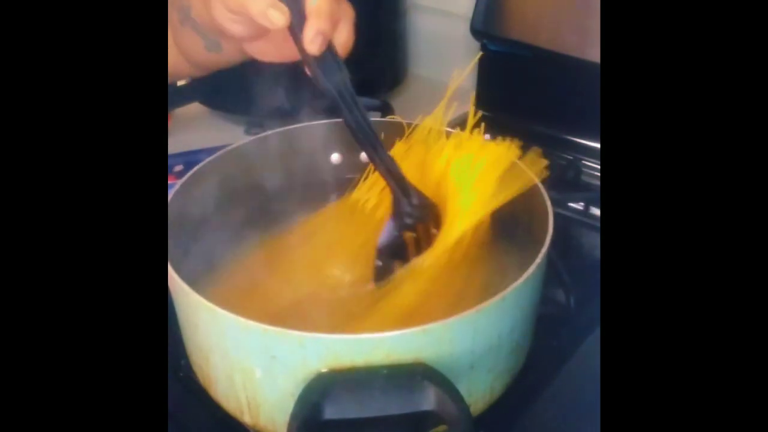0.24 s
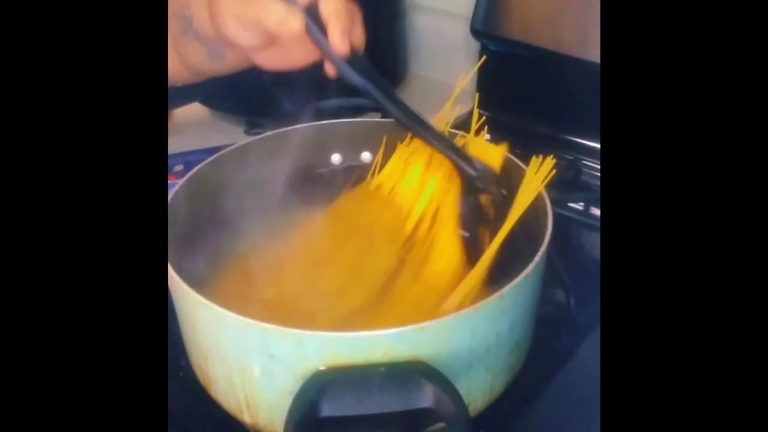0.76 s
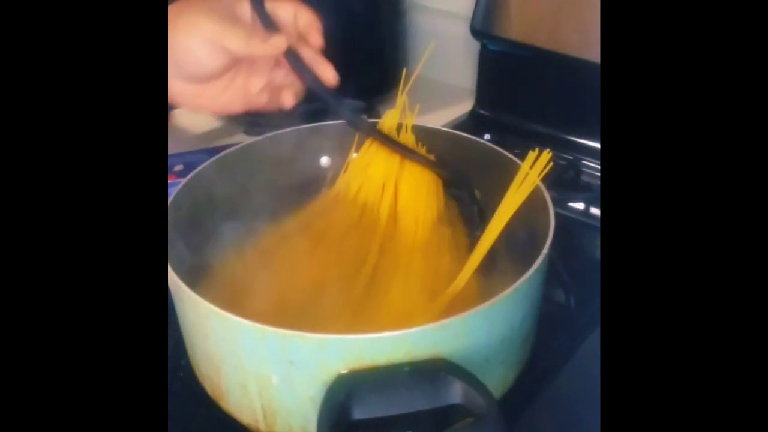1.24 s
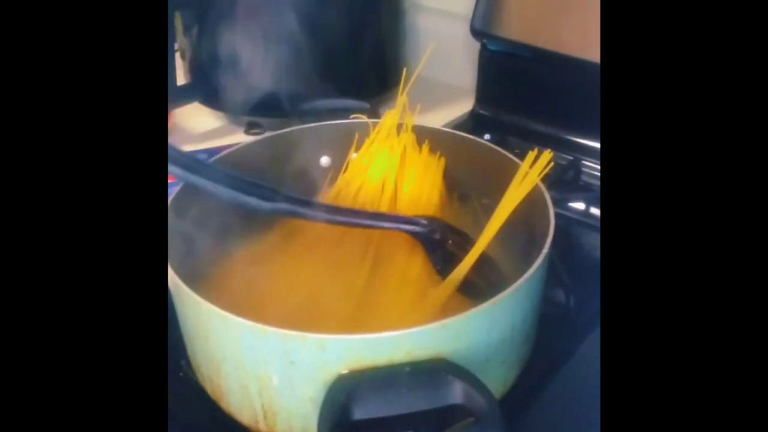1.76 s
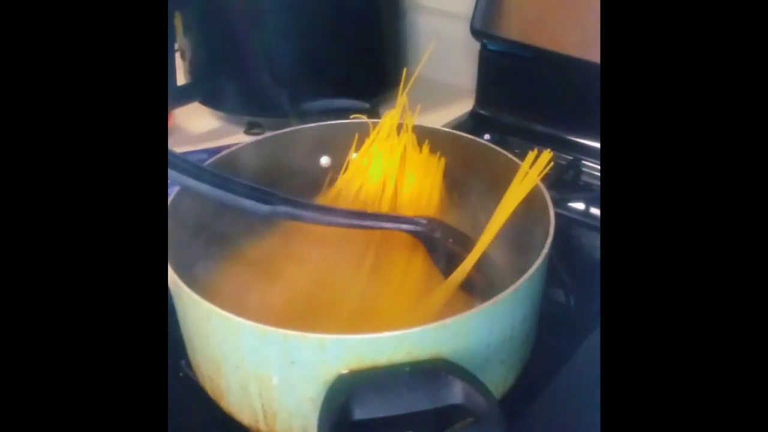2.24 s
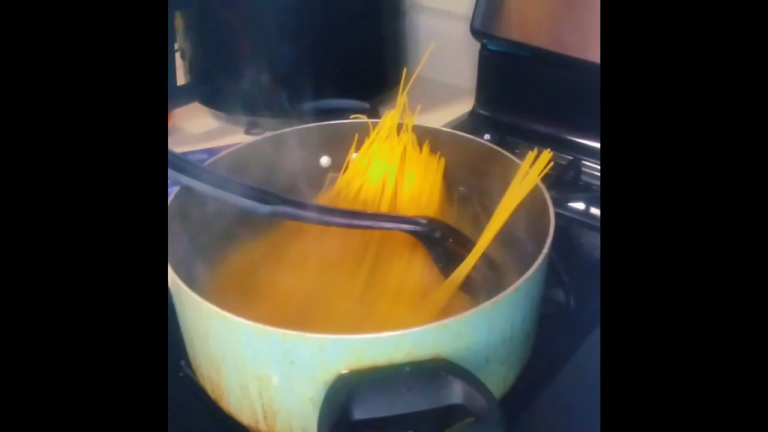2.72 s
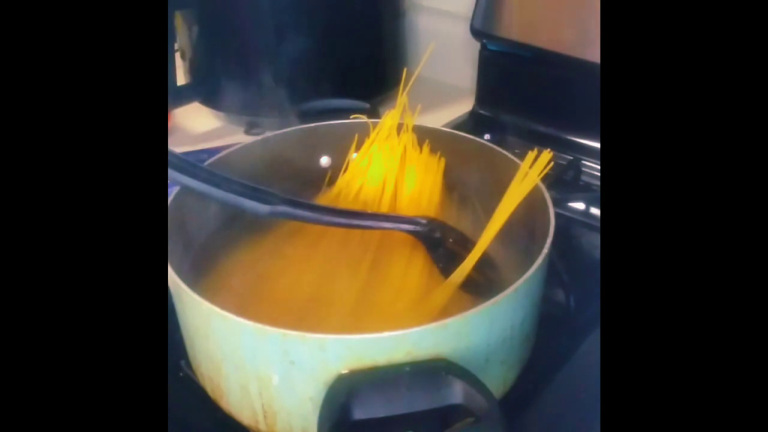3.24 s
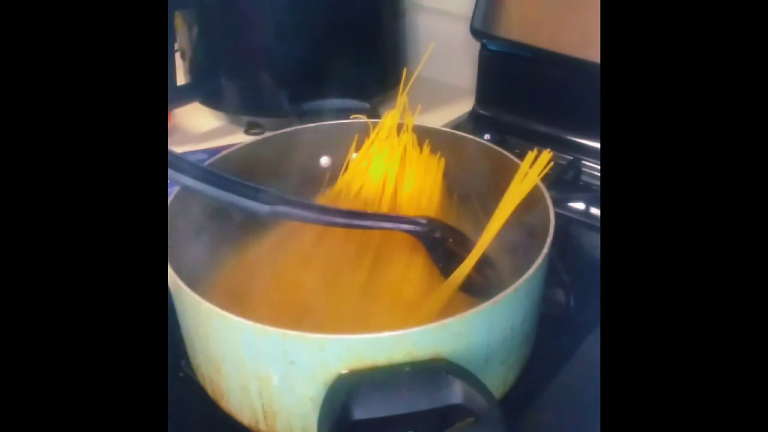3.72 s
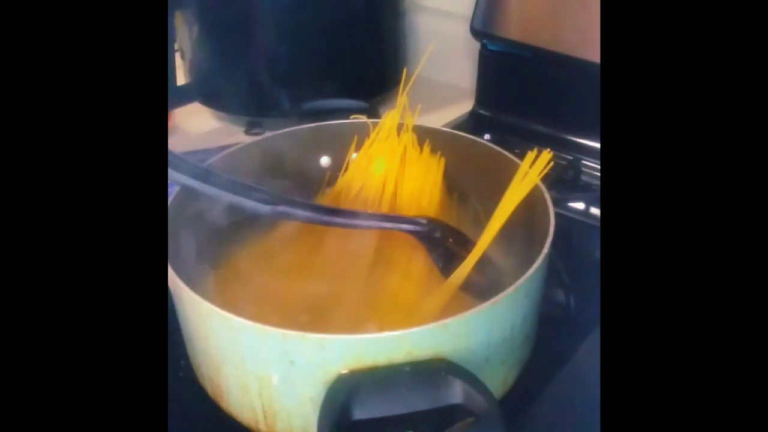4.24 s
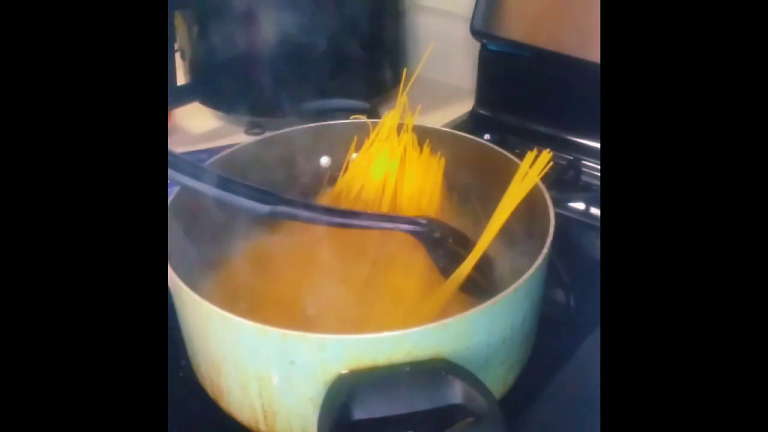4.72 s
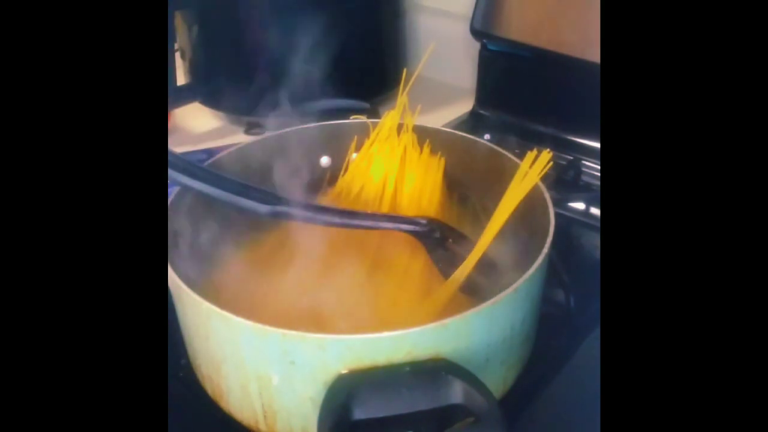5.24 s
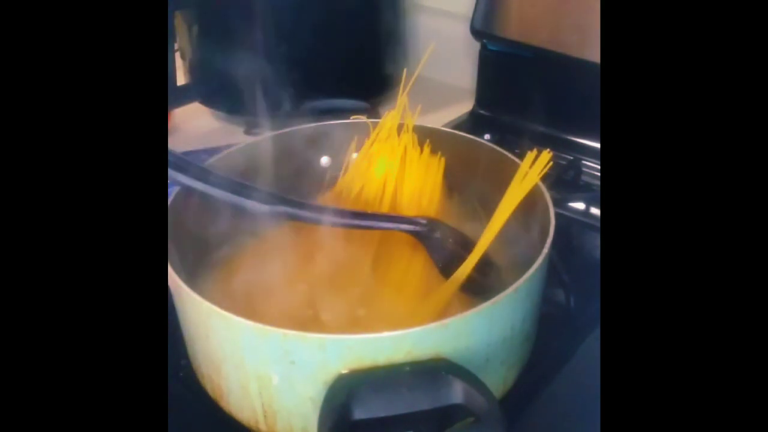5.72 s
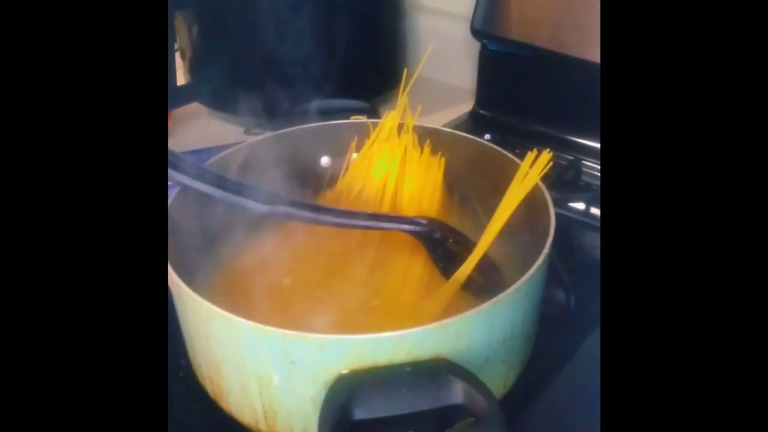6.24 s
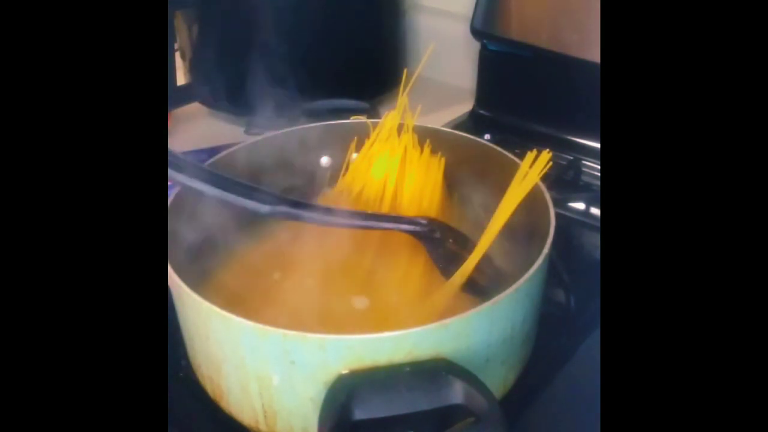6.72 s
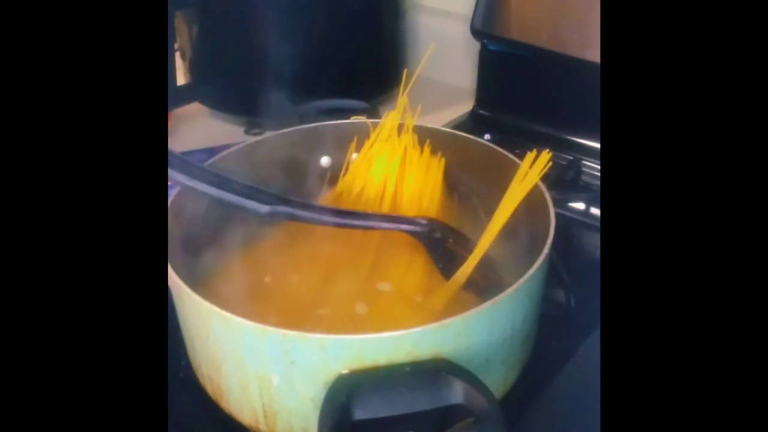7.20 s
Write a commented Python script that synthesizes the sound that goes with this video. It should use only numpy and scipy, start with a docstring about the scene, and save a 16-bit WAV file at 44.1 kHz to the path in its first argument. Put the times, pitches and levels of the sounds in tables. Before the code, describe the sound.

Pot of water simmers while a plastic spoon clicks and bumps; sizzles flare and cut off, then surge with brittle crackling and gurgles.

```python
"""A pot of water simmers; plops and bumps of a plastic spoon are heard, and short sizzles flare, sag and break off.
From 0.6 s the first of three longer boils sizzles, with clicks of spoon and dry spaghetti from then on.
The later two, near 2.8 s and 4.3 s, surge, with gurgles and brittle ticks; from 5.9 s the spoon also scrapes.
Sizzle is random bursts shaped by filters, bubbles are fading tones, clicks are short noise; steam that escapes
alone whistles. The hollow of the pot colours sizzle and clicks, and a small kitchen answers softly."""
import sys
import numpy as np
from scipy import signal
from scipy.fft import rfft, irfft, next_fast_len
from scipy.io import wavfile
from scipy.ndimage import uniform_filter1d

SR = 44100
rng = np.random.default_rng(int(sys.argv[2]) if len(sys.argv) > 2 else 0)


def dump_mix(stems):
    """Bounce the given channels to the path in sys.argv[1] as a 16-bit WAV at rate SR."""
    frames = np.atleast_2d(stems).T  # one column per channel
    limited = np.clip(frames, -1, 1)  # hard clip at full scale
    pcm = np.round(limited * 32767).astype(np.int16)
    wavfile.write(sys.argv[1], SR, pcm)


N = 328986
TOP_HZ = 15800  # nothing is kept above this

# borders between spatter, hiss, steam and fizz, the sizzle's grain sizes from coarse to fine: [f/Hz]
GRAIN_EDGES = [860, 2400, 6800, 9800, 15800]
# spectrum of low noise: [f/Hz, relative level/dB]
LOW_SPECTRUM = [(30, -13.5), (60, -5), (250, -2.5), (500, -11), (4000, -34.5)]
# spectrum of a hard, dry contact: [f/Hz, relative level/dB]
SNAP_SPECTRUM = [(300, -14.5), (1300, 8.5), (4000, 11.5), (8000, 13.5), (10500, 2.5), (15800, -20.5)]


def sizzle(gains, on):
    """Water flashes to steam in tiny bursts; gurgles follow the spatter, low noise comes and goes with the sizzle."""
    # spectrum of the bursts: [f/Hz, relative level/dB]
    sizzle_spectrum = [(1000, -2.5), (1350, 11), (3300, 7), (6300, 9.5), (7500, 11), (8700, 17), (10000, 2),
                       (12500, -4.5), (15800, -11.5)]
    # share of the surrounding half second that sizzles
    sustained = np.abs(uniform_filter1d(on, SR // 2))

    # a weak flare comes from a few spots, each with its own colour; a strong one is dense and even
    strength = gains.sum(axis=0) / amp(-19.5)
    even = np.clip(strength ** 2 + 0.68 * sustained ** 2, 0, 1)
    spots = unit(patchy(crackle(rate=7000, spread_db=7), depth_db=6.5, size=(5, 10)))
    dense = unit(patchy(crackle(rate=5500, spread_db=10), depth_db=3.8, size=(6, 4)))
    bursts = np.sqrt(even) * dense + np.sqrt(1 - even) * spots

    # the bursts come in clusters a few milliseconds long
    clusters = amp(1.3 * wobble(hz=90))
    bursts = hollow(coloured(bursts * clusters, sizzle_spectrum))
    spatter, hiss, steam, fizz = [unit(band(bursts, lo, hi)) for lo, hi in zip(GRAIN_EDGES, GRAIN_EDGES[1:])]
    # a long boil leaves less of the steam to whistle
    share = whistle_share(gains) * (1 - sustained ** 2 / 2)
    grains = np.sum(gains * [spatter, hiss, narrowed(steam, share), fizz], axis=0)

    clumps = patchy(bubbling(rate=130, mid_hz=800, spread=.8, cycles=32), depth_db=4, size=(5, 7))
    # the gurgle follows the spatter; a long boil gurgles more
    gurgle_gain = amp(-12.5) * sustained ** 0.32 * np.abs(gains[0]) ** 0.98
    gurgle = gurgle_gain * unit(hollow(clumps))
    low_noise = amp(-65.0) * on * unit(coloured(rng.standard_normal(N), LOW_SPECTRUM))
    return grains + ticks(gains, sustained) + gurgle + low_noise


def flare_gains():
    """Strength of each grain size, and where the sizzle is heard; its sound starts and stops abruptly."""
    # short flares: [start t/s, end t/s, spatter level/dB, hiss level/dB, steam level/dB, fizz level/dB]
    flares = [ (0.103, 0.203, -71.5, -49.5, -45.5, -48.5), (0.404, 0.458, -77, -52.5, -46.5, -53.5),
              (0.489, 0.513, -79, -51, -42, -49), (0.553, 0.595, -66, -41.5, -50, -55),
              (1.03, 1.131, -51, -50, -44.5, -52.5), (1.222, 1.328, -49, -43, -55, -72),
              (1.355, 1.525, -48.5, -47.5, -43, -71), (1.847, 1.885, -51, -41.5, -46, -51),
              (2.111, 2.185, -75, -74, -41.5, -82.5), (2.389, 2.471, -46, -41.5, -50, -55.5),
              (2.535, 2.548, -52, -41, -42.5, -53), (2.65, 2.691, -48, -44.5, -61, -75),
              (2.728, 2.793, -51, -45.5, -58.5, -58), (4.024, 4.1, -57, -65.5, -53.5, -41.5),
              (5.589, 5.74, -53.5, -44.5, -48, -58), (5.722, 5.82, -65.5, -54, -43, -50),
              (5.794, 5.863, -51.5, -52.5, -49, -56), (6.043, 6.109, -43.5, -41, -70, -59),
              (6.677, 6.746, -49, -53, -48, -64), (7.12, 7.147, -40, -53.5, -58.5, -72)]
    # how far each grain size would die down in an endless flare: [drop/dB]
    sag_drops = [20, 9.3, 20, 35]
    half_sag_s = 0.14  # half of that drop is reached after this time
    # the three long boils, each a list of points: [t/s, level/dB, coarseness/dB]
    boils = [
        [(.625, -31, -18), (.71, -32, -11.5), (.85, -30, -35.5), (1.03, -38, -30)],
        [(2.78, -33.5, -0.5), (2.9, -50, 10), (3.3, -36, 2), (3.65, -38.5, -1.5), (3.815, -46, 0)],
        [(4.258, -38, 0.5), (4.44, -41.5, -1.5), (4.55, -40, 4), (4.8, -33, -6.5), (4.92, -38.5, 12.5),
         (5.36, -34.5, 3), (5.523, -54.5, 10.5)],
    ]
    # brief surges of the sizzle: [t/s, level/dB, coarseness/dB, fade/s]
    surges = [(1.44, -36.5, -28, 0.05), (2.969, -29.5, 4, 0.068), (3.368, -27.5, 4, 0.048),
              (3.466, -27.5, -9.5, 0.067), (4.312, -30.5, -6.5, 0.042), (4.537, -32, -2, 0.038),
              (4.63, -26, -25, 0.013), (4.986, -30.5, 15, 0.021), (5.169, -19, -8, 0.034),
              (5.248, -27, -8.5, 0.011), (5.65, -38, 3, 0.035)]
    surge_rise_s = 0.027

    t = np.arange(N) / SR
    power, on = np.zeros((4, N)), np.zeros(N)
    for start, end, *levels in flares:
        i = np.arange(round(start * SR), round(end * SR))
        age = (i - i[0]) / SR
        for grain, (db, sag) in enumerate(zip(levels, sag_drops)):
            sagging = unit(amp(-sag * age / (age + half_sag_s)))
            power[grain, i] = (amp(db) * sagging) ** 2
        on[i] = 1
    for rows in boils:
        i = np.arange(round(rows[0][0] * SR), round(rows[-1][0] * SR))
        power[:, i] = grain_levels(*curves(rows)[:, i]) ** 2
        on[i] = 1
    for s, db, coarse_db, fade in surges:
        shape = np.exp(-np.where(t < s, ((t - s) / surge_rise_s) ** 2, (t - s) / fade))
        power += np.outer(grain_levels(db, coarse_db) ** 2, on * shape ** 2)
    width = round(.005 * SR)  # 5 ms of smoothing softens the starts and stops
    return uniform_filter1d(np.sqrt(power), width), uniform_filter1d(on, width)


def grain_levels(db, coarse_db):
    """Gains of spatter, hiss, steam and fizz in a boil of this level and coarseness."""
    # each grain size relative to the level of the boil: [level/dB]
    grain_offsets = [-11, -5.5, -3, -10.5]
    # what each grain size gains per dB of coarseness: [slope/(dB per dB)]
    coarse_slopes = [1, 0.48, 0.13, 0.22]
    return amp([db + base + slope * coarse_db for base, slope in zip(grain_offsets, coarse_slopes)])


def whistle_share(gains):
    """Steam whistles when it escapes alone: 1 where it outweighs hiss and fizz by 0.5 dB, otherwise 0."""
    _, hiss, steam, fizz = np.abs(gains) + 1e-9
    lead_db = 20 * np.log10(steam / np.hypot(hiss, fizz))
    return (lead_db > 0.5).astype(float)


def narrowed(steam, share):
    """Part of the rushing steam gathers into a breathy whistle whose pitch wanders slowly."""
    # pitch of the whistling steam: [t/s, f/Hz]
    steam_pitch = [(.8, 7620), (1.47, 8090), (2.15, 7745)]
    pitch_hz = curves(steam_pitch)[0] + 107 * wobble(hz=4.6)  # wanders by 107 Hz rms
    return np.sqrt(1 - share) * steam + np.sqrt(share) * whistle(pitch_hz, width_hz=320)


def ticks(gains, sustained):
    """Brittle ticks, strongest in the long boils: many faint, a few sharp."""
    snaps = patchy(crackle(rate=520, spread_db=13), depth_db=5, size=(9, 2))
    snaps = snaps * amp(3.5 * wobble(hz=20))
    snaps = unit(band(hollow(coloured(snaps, SNAP_SPECTRUM)), GRAIN_EDGES[1], TOP_HZ, order=3))
    return amp(-2.5) * sustained * gains[1] * snaps  # they follow the hiss


def clicks(t60=0.0085, lead_t60=.006, tail_db=-15, tail_t60=0.21, top_hz=7500):
    """A brief catch, a sharp crack, then a short scatter between the pot's walls; dull contacts lose their top."""
    # spoon and pasta clicks and spits of water, before the hollow rings: [t/s, peak level/dB, dullness/dB]
    contacts = [(0.608, -28, -1.5), (1.0269, -15, 7), (1.2242, -17.5, -1.5), (2.379, -30, -5),
                (2.508, -32.5, -2), (2.7806, -22, 9), (3.277, -12.5, -0.5), (3.39, -9, -12.5),
                (3.467, -14, -25), (3.601, -12.5, -9.5), (4.713, -7.5, -5), (5.0489, -10, -5),
                (5.144, -8, -8.5), (5.1538, -9, -7.5), (5.229, -12, -5.5), (5.2352, -8.5, 7.5),
                (5.2597, -15, -14.5), (5.942, -43.5, 30), (6.687, -18, 9), (7.192, -38, 8)]
    out, t = np.zeros(N), np.arange(-SR // 64, SR // 8) / SR
    catch_and_crack = amp(-60 * np.abs(t) / np.where(t < 0, lead_t60, t60))
    scatter = (t > 0) * amp(tail_db - 60 * t / tail_t60)
    for s, db, dull_db in contacts:
        crack = coloured(rng.standard_normal(len(t)) * (catch_and_crack + scatter), SNAP_SPECTRUM)
        # the two soft edges may cross, which leaves only a weak treble
        bright = band(crack, 9500, top_hz * amp(-.2 * dull_db), order=4)
        dull = amp(dull_db - 9.0) * band(crack, 900, 4700, order=3)
        crack = bright + dull
        add(out, s + t[0], amp(db) * crack / np.abs(crack).max())
    return hollow(out)


def scrapes(width_hz=420):
    """The spoon slides on the pasta, sticking and slipping in uneven fits; each slip rings its short resonances."""
    # slides of the spoon: [start t/s, length/s, level/dB]
    slides = [(5.91, .13, -52), (6.437, 0.19, -59), (7.161, 0.288, -61.5)]
    # resonances of the spoon: [f/Hz, level of each/dB]
    spoon_modes = [(1330, 3), (2500, 3), (4050, -2.5)]
    slips = patchy(crackle(rate=900, spread_db=8), depth_db=6, size=(7, 3))
    slips = slips * amp(3 * wobble(hz=25))
    rasp = filtered(slips, lambda f: sum(amp(db) * resonance(f, hz, width_hz) ** 2 for hz, db in spoon_modes))
    rasp = unit(band(rasp, 700, 5500, order=3))
    t, gain = np.arange(N) / SR, np.zeros(N)
    for s, length, db in slides:
        gain += amp(db) * np.clip(np.minimum(t - s, s + length - t) / .015, 0, 1)  # 15 ms ramps
    return rasp * gain


def plops_and_taps(cycles=28, rough=0.45, splash_db=-6, splash_t60=0.053):
    """Plops and light spoon taps, each with a short ring, a splutter at its own pitch and a brighter splash."""
    # plops and taps; ring, splutter and splash are set relative to the level: [t/s, level/dB, f/Hz]
    short_rings = [(0.045, -31.5, 2700), (0.494, -36, 683), (2.662, -29, 1550), (2.731, -29.5, 1570),
                   (3.468, -39, 612), (3.537, -39, 606), (3.769, -34, 496), (4.138, -37, 522),
                   (4.477, -36.5, 502), (4.732, -28.5, 1294), (4.736, -30.5, 716), (5.482, -39.5, 486),
                   (7.104, -34, 840), (7.119, -32, 726)]
    out, t = np.zeros(N), np.arange(SR // 10) / SR
    for s, db, hz in short_rings:
        ring = bubble(hz, cycles, rise=0.048)
        fading_noise = rng.standard_normal(len(t)) * amp(-60 * t * hz / cycles)
        splutter = signal.fftconvolve(bubble(hz, cycles / 2, rise=0), fading_noise)
        splash = band(rng.standard_normal(len(t)) * amp(-60 * t / splash_t60), hz, 2 * hz, order=4)
        add(out, s, amp(db + 4.5) * ring)
        add(out, s, amp(db + 3.0) * rough * splutter / np.abs(splutter).max())
        add(out, s, amp(db + splash_db) * splash / np.abs(splash).max())
    return out


def gurgles(rate=120, cycles=28, scatter=0.14):
    """A pocket of steam works its way up as a chain of bubbles, alike within scatter octaves."""
    # chains of bubbles: [start t/s, length/s, level/dB, f/Hz]
    chains = [(0.725, 0.15, -58.5, 747), (1.356, 0.042, -51, 805), (3.343, .06, -45, 625),
              (3.968, 0.11, -55, 758), (4.014, .085, -50, 1310), (4.08, 0.42, -60.5, 505),
              (4.14, .018, -40, 1295), (4.954, 0.061, -37, 1086), (5.792, 0.078, -46.5, 1290),
              (5.795, 0.072, -50, 775), (6.409, 0.094, -61.5, 727), (6.627, 0.045, -53.5, 1285),
              (6.8, 0.13, -61.5, 746), (7.115, 0.028, -46, 1286)]
    out = np.zeros(N)
    for s, length, db, hz in chains:
        chain, count = np.zeros(SR), int(length * rate) + 1
        for k, (late, pitch, size) in enumerate(rng.uniform(-1, 1, size=(count, 3))):
            when = length * (k + late / 2) / count
            add(chain, when, amp(11 * size) * bubble(hz * 2 ** (scatter * pitch), cycles, rise=0))
        # unit() counts the whole second, so a short chain is scaled by its length
        add(out, s, amp(db) * np.sqrt(length) * unit(chain))
    return out


def knocks(detune=0.051):
    """The pot thuds on its burner, seated a little differently each time; a harder bump also rings its wall."""
    # bumps of the spoon on the pot: [t/s, level/dB, extra ring above 300 Hz/dB]
    bumps = [(0.108, -50.5, -17), (.195, -53.5, 0), (.359, -42.5, 10), (0.381, -36.5, -1),
             (4.051, -53.5, -11), (5.11, -53, -6)]
    # tones of the pot on its burner, before detuning: [f/Hz, relative level/dB, time to fade by 60 dB/s]
    body_modes = [(81, 2, 0.3), (109, 10, 0.088), (177, -2.5, 0.12), (523, 6, 0.075), (1105, 1, 0.032)]
    out, t = np.zeros(N), np.arange(SR // 3) / SR
    for s, db, ring_db in bumps:
        modes = np.zeros(len(t))
        for hz, level, t60 in body_modes:
            pitch = hz * (1 + detune * rng.standard_normal())
            modes += amp(level + ring_db * (hz > 300) - 60 * t / t60) * np.sin(2 * np.pi * pitch * t)
        scuff = amp(1 - 60 * t / 0.047) * unit(coloured(rng.standard_normal(len(t)), LOW_SPECTRUM))
        soft_start = 1 - np.exp(-t / 0.0038)
        add(out, s, amp(db) * (modes + scuff) * soft_start)
    return band(out, 38, 8000, order=3)


def simmer(gains):
    """Small bubbles murmur and the hot base sings, over low noise and a low hum that wavers."""
    # spectrum of the murmuring bubbles: [f/Hz, relative level/dB]
    murmur_spectrum = [(300, -25.5), (560, -12), (740, 4.5), (1000, -9), (1350, -5), (1900, -21),
                       (2600, -3.5), (4500, -18.5), (9000, -55.5)]
    # spectrum of the singing base: [f/Hz, relative level/dB]
    singing_spectrum = [(3750, -13.5), (4020, 13), (4350, -5), (6400, -3), (7500, 13), (9300, 6),
                        (10100, -10.5)]
    bubbling_gain, singing_gain = simmer_gains(gains)
    water = patchy(rng.standard_normal(N), depth_db=5.5, size=(5, 11))
    murmur = bubbling_gain * unit(coloured(water, murmur_spectrum))
    base = band(patchy(rng.standard_normal(N), depth_db=8, size=(4, 11)), 1800, 11000, order=4)
    singing = singing_gain * unit(coloured(base, singing_spectrum))
    hum = amp(-72) * whistle(np.full(N, 60), width_hz=5)
    low_noise = amp(-74.0) * unit(coloured(rng.standard_normal(N), LOW_SPECTRUM))
    return murmur + singing + hum + low_noise


def simmer_gains(gains, bubbling_db=-77, singing_db=-70, calm_s=0.0041):
    """Strength of bubbling and singing: at rest, stirred by spatter and steam, and swelling now and then."""
    # the stir of bubbling by spatter, and of singing by steam, relative to these: [level/dB]
    stir_levels = [-5.5, -17]
    # swells of the quiet boil: [t/s, half width/s, bubbling level/dB, singing level/dB]
    swells = [(.03, 0.096, -68.5, -55), (4.18, 0.48, -63, -63), (6.52, 0.051, -64, -56.5),
              (7.42, 0.18, -62.5, -67.5)]
    t, keep = np.arange(N) / SR, np.exp(-1 / (calm_s * SR))
    # the stir settles within milliseconds
    stir = amp(stir_levels)[:, None] * signal.lfilter([1 - keep], [1, -keep], gains[::2])
    power = amp([[bubbling_db], [singing_db]]) ** 2 + stir ** 2
    for s, width, *levels in swells:
        power += np.outer(amp(levels) ** 2, np.exp(-((t - s) / width) ** 2))
    return np.sqrt(power)


def kitchen(x, t60=0.24):
    """The short answer of the cupboards and walls, as noise that fades by 60 dB in t60 seconds."""
    t = np.arange(SR // 3) / SR
    tail = rng.standard_normal(len(t)) * amp(-60 * t / t60)
    return signal.fftconvolve(x, tail / np.linalg.norm(tail))[:N]


def hollow(x):
    """The direct sound and the ringing of the pot."""
    # air and wall of the pot: [f/Hz, width/Hz, level/dB]
    pot_modes = [(780, 28, 0.5), (1074, 5, 9.5), (2730, 11, -1.5), (4083, 90, 1)]
    return filtered(x, lambda f: 1 + sum(amp(db) * resonance(f, hz, width) for hz, width, db in pot_modes))


def resonance(f, hz, width_hz):
    """Response of one resonance: 1 at its pitch hz, less on either side."""
    return 1j * f * width_hz / (hz * hz - f * f + 1j * f * width_hz)


def bubble(hz, cycles, rise):
    """A bubble-like tone that fades by 60 dB over some cycles, while its pitch may rise."""
    t = np.arange(int(SR * cycles / hz) + 2) / SR
    age = t * hz / cycles
    soft_start = 1 - np.exp(-t * hz)
    return np.sin(2 * np.pi * hz * t * (1 + rise * age)) * amp(-60 * age) * soft_start


def bubbling(rate, mid_hz, spread, cycles, rise=0.12):
    """A stream of bubbles, rate a second, of random size and of random pitch within spread octaves of mid_hz."""
    out = np.zeros(N)
    for when, pitch, size in rng.random((int(rate * N / SR), 3)):
        hz = mid_hz * 2 ** (spread * (2 * pitch - 1))
        add(out, when * N / SR, amp(16 * size) * bubble(hz, cycles, rise))
    return unit(out)


def crackle(rate, spread_db):
    """Single-sample bursts at random, about rate a second, their sizes spread up to spread_db either way."""
    hits = rng.random(N) < rate / SR
    return unit(hits * rng.choice([-1, 1], N) * amp(spread_db * rng.uniform(-0.88, 1, N)))


def whistle(pitch_hz, width_hz):
    """A breathy, wavering line of sound: a tone whose strength follows slow noise."""
    waver = filtered(rng.standard_normal(N), lambda hz: 1 / (1 + (hz / width_hz) ** 4))
    return unit(waver * np.sin(2 * np.pi * np.cumsum(pitch_hz) / SR))


def patchy(x, depth_db, size):
    """Colour that drifts at random, in patches of size (frequency bins, time frames)."""
    z = signal.stft(x, nperseg=2 ** 10)[2]
    field = rng.standard_normal(z.shape)
    for axis, width in enumerate(size):
        field = uniform_filter1d(field, width, axis)
    return signal.istft(z * amp(depth_db * unit(field)))[1][:N]


def wobble(hz):
    """A smooth random curve that moves up to about hz times a second."""
    return unit(filtered(rng.standard_normal(N), lambda f: np.exp(-(f / hz) ** 2)))


def coloured(x, points):
    """x through a spectrum of (Hz, dB) points."""
    f, db = np.transpose(points)
    return filtered(x, lambda hz: amp(np.interp(np.log(hz + 1), np.log(f), db)))


def band(x, lo, hi, order=10):
    """The part of x between two soft edges in Hz."""
    def edges(hz):
        low_edge = 1 + (lo / (hz + 1)) ** (2 * order)
        high_edge = 1 + (hz / hi) ** (2 * order)
        return (low_edge * high_edge) ** -.5
    return filtered(x, edges)


def filtered(x, response):
    """x with each frequency scaled by a response."""
    m = next_fast_len(len(x) + 8192)  # spare room for the ringing
    return irfft(rfft(x, m) * response(np.fft.rfftfreq(m, 1 / SR)), m)[:len(x)]


def curves(rows):
    """One value per sample for each column after the time."""
    s, *cols = np.transpose(rows)
    return np.array([np.interp(np.arange(N) / SR, s, c) for c in cols])


def add(track, s, sound):
    """Mix a sound in at time s."""
    part = track[max(round(s * SR), 0):][:len(sound)]
    part += sound[:len(part)]


def amp(db):
    """Decibels to gain."""
    return 10 ** (np.asarray(db) / 20)


def unit(x):
    """x scaled to an rms of 1."""
    return x / np.sqrt(np.mean(x ** 2) + 1e-20)


def scene():
    """Sizzle, clicks, scrapes, plops, taps, gurgles and knocks with the kitchen's answer, over the quiet boil."""
    gains, on = flare_gains()
    pot = sizzle(gains, on) + clicks() + scrapes() + plops_and_taps() + gurgles() + knocks()
    return (pot + amp(-11.5) * kitchen(pot) + simmer(gains))[None]


def record(dry):
    """Nothing is kept above the band limit."""
    return filtered(dry[0], lambda hz: hz < TOP_HZ)[None]


dry = scene()
out = record(dry)
dump_mix(out)
```